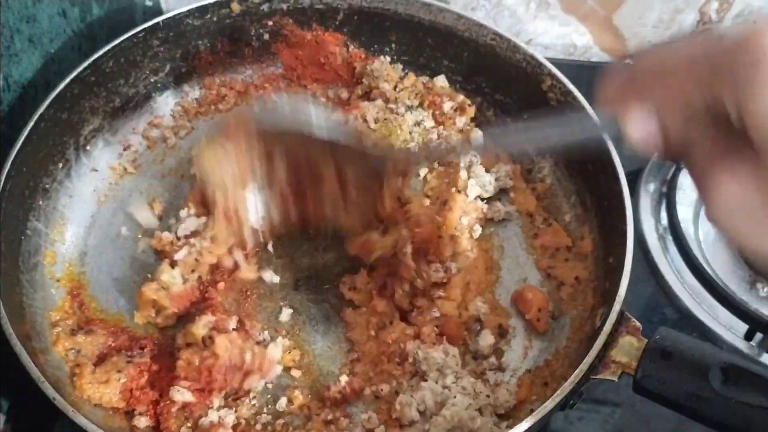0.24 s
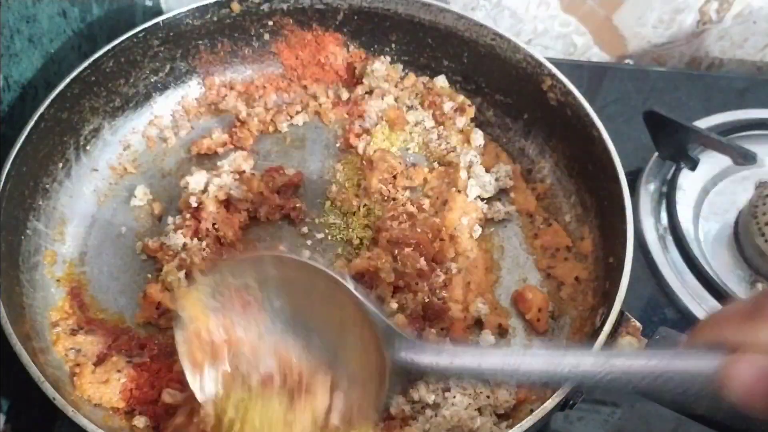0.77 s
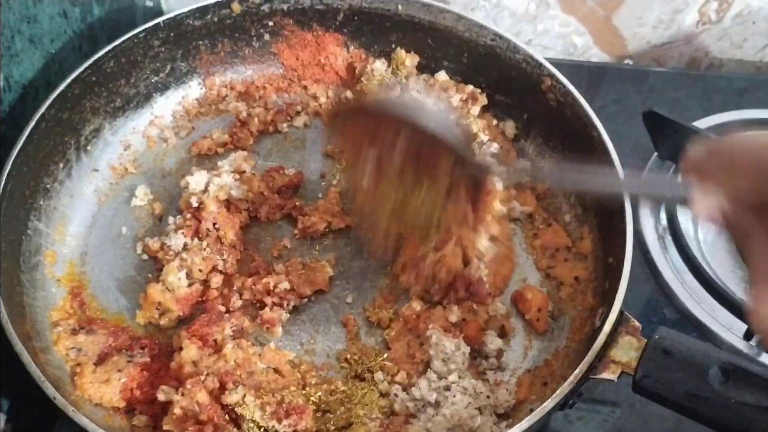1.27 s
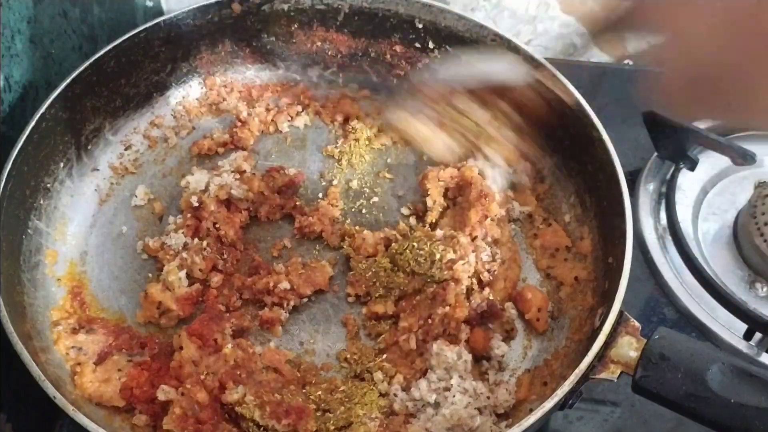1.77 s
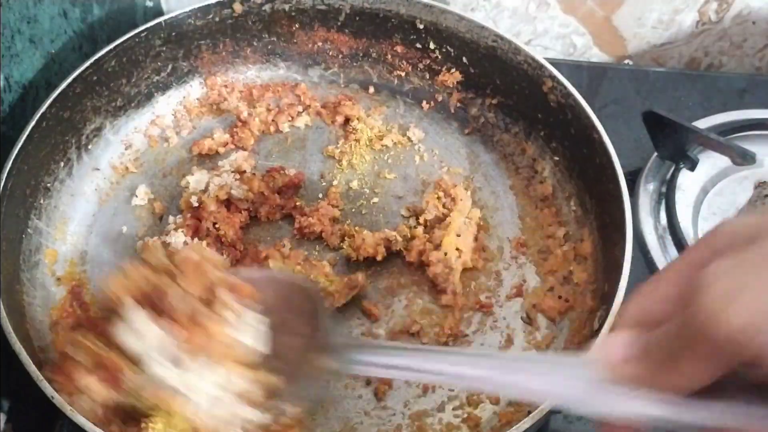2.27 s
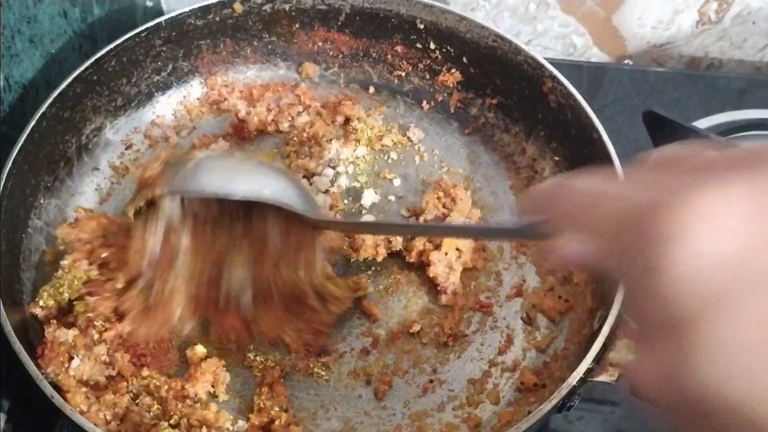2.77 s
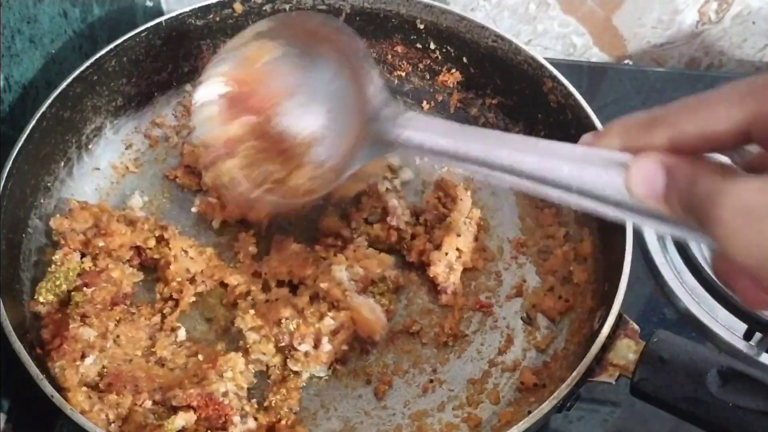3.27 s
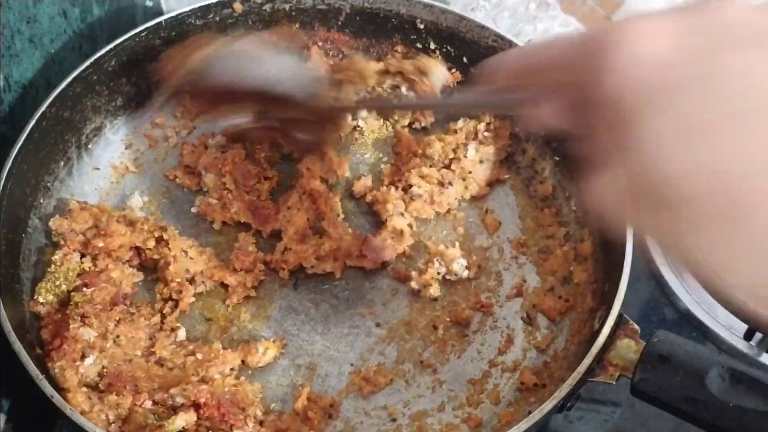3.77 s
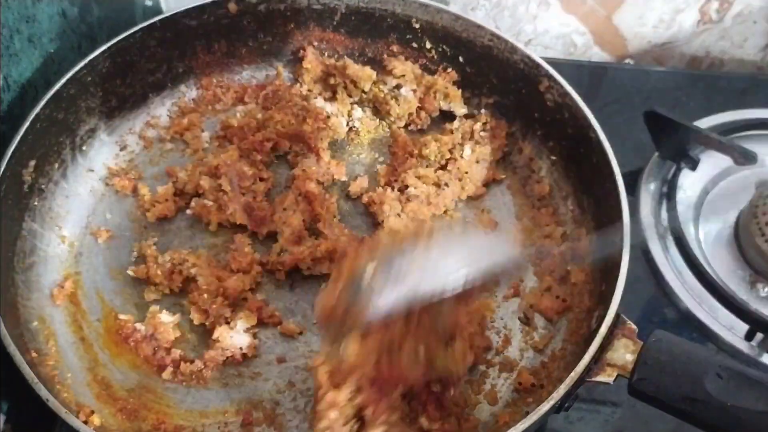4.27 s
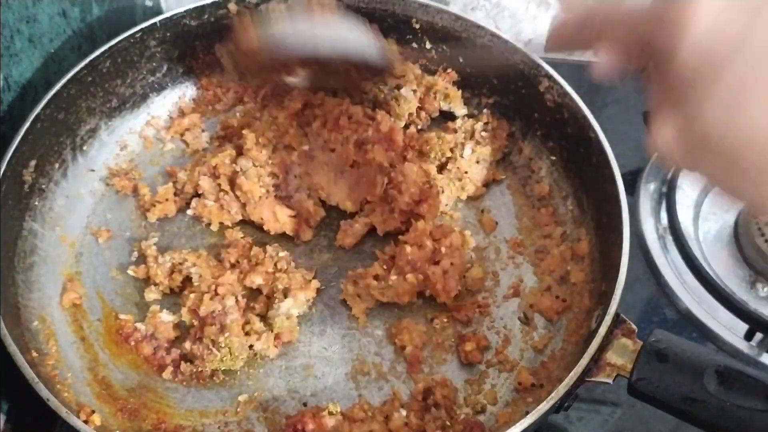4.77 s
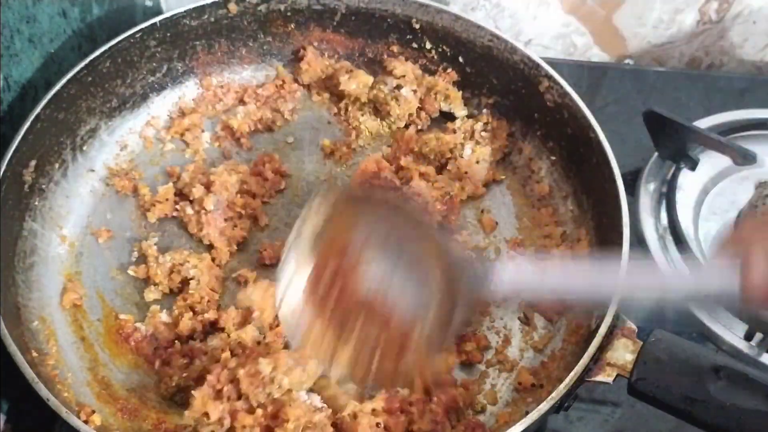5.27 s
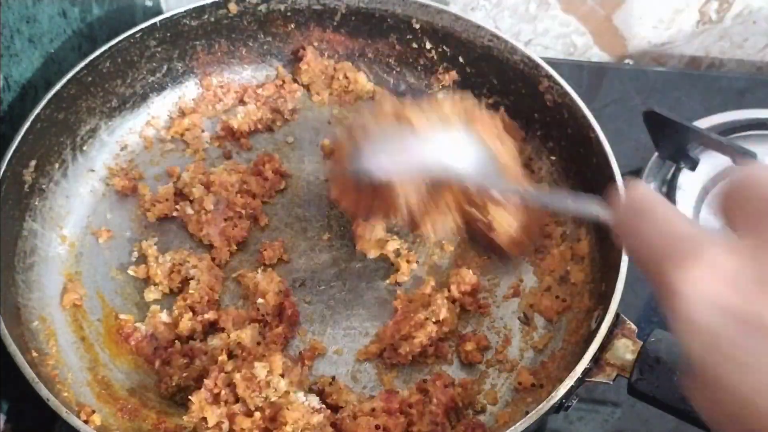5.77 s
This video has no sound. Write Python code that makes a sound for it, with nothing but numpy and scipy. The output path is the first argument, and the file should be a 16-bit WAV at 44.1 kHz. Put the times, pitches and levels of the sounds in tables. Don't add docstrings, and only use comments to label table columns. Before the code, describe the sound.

Brisk metallic taps and rasping drags of a metal spoon on a pan, close up, with constant crackling frying hiss underneath.

```python
import sys
import numpy as np
from scipy import signal
from scipy.fft import rfft, irfft, next_fast_len
from scipy.io import wavfile
from scipy.ndimage import uniform_filter1d, minimum_filter1d, map_coordinates

SR = 44100
rng = np.random.default_rng(int(sys.argv[2]) if len(sys.argv) > 2 else 0)


def log_audio(samples):
    frames = np.atleast_2d(samples).T
    limited = np.clip(frames, -1, 1)
    pcm = np.round(limited * 32767).astype(np.int16)
    wavfile.write(sys.argv[1], SR, pcm)


def attenuation_scalar(level_db):
    decades = np.asarray(level_db, float) / 20
    return 10 ** decades


N = 265923

# time in seconds, level in dB.
SIZZLE_LEVEL = [(0.0, -33.5), (0.22, -35), (0.37, -31), (0.84, -32), (1.26, -30.5), (1.53, -32),
                (1.91, -33.5), (2.87, -32), (3.02, -33.5), (3.31, -35.5), (3.79, -33), (4.06, -33),
                (4.75, -29), (4.95, -31.5), (5.62, -32.5), (5.81, -33.5), (6.03, -32.5)]
# frequency in Hz, density in dB per Hz.
BUBBLE_SPECTRUM = [(59, -36), (100, -19), (356, -10.5), (543, -17.5), (941, -12), (1160, -14.5),
                   (1780, -11), (2890, -11.5), (3280, -22), (3570, -14), (4800, -13), (8500, -3),
                   (10100, -2.5), (11200, 3.5), (15700, -14.5)]
# frequency in Hz, width in Hz, level in dB.
PAN_LOW_MODES = [(745.2, 47.8, 0.5), (800.5, 59.7, 6), (845.7, 52.4, 4), (948, 23.2, 6), (1009.6, 87.2, 2),
                 (1055.2, 39.8, -1.5), (856, 681, -9)]
# frequency in Hz, width in Hz, level in dB.
PAN_HIGH_MODES = [(1247.3, 52, -5.5), (1350, 42, 2.5), (1353.3, 37.5, -1.5), (1460, 86, -6.5),
                  (1659, 63.4, -1.5), (1779.3, 74.5, -4), (1924.8, 71.7, -1), (1460, 496, -7.5)]
# frequency in Hz, width in Hz, level in dB.
TRIVET_MODES = [(240.5, 56.8, 0.5), (361.8, 40.6, 1.5), (431.3, 83, -1.5), (633.6, 31.5, 1.5)]
# frequency in Hz, width in Hz, level in dB.
RIM_MODES = [(1997.7, 49, -4.5), (2270.4, 61, -9), (2411, 73, -3), (2743, 62, -16.5), (2955.4, 46.5, -6),
             (2620, 1295, -10.5)]
# frequency in Hz, density in dB per Hz.
RASP_SPECTRUM = [(1500, -44.5), (2600, 0.5), (3520, 4.5), (4500, 4), (6300, 4.5), (8700, 5), (10300, 2.5),
                 (11300, 10.5), (12500, -1.5), (15500, -17)]
# landing in seconds, force in dB, high over low pan modes in dB,
# weight on the trivet over force in dB, time to fade 20 dB in seconds.
SKIDS_ON_STEEL = [(0.187, -25, 0.4, -3, 0.171), (.559, -33.5, 5.5, 4, .06), (.930, -43.5, -6.5, 6.5, 0.12),
                  (1.004, -33, 3, -17, 0.16), (1.338, -38.5, 2.5, 9, 0.0933), (1.690, -37, -8, 0.5, 0.1234),
                  (1.734, -25.5, -2, -7, 0.12), (1.8, -41.5, 4, 1, 0.22), (1.91, -40.5, 1, -.5, 0.15),
                  (2.053, -30, .7, -7.5, 0.14), (2.19, -46, 7, 4, .12), (2.77, -23.5, 1.5, -11, .155),
                  (3.553, -36, -5, 4.5, 0.0726), (3.960, -34, 8.5, 3, .13), (4.01, -22, -3.5, -4.5, .13),
                  (4.12, -41, -1, 1.5, 0.1948), (4.503, -30, -2, 4.5, 0.045), (4.924, -33.5, 4, 6, 0.16),
                  (4.960, -27.5, 0.6, -4.5, 0.1809), (5.812, -37, 11.5, -18, .07)]
# moment of most force in seconds, force in dB,
# high over low pan modes in dB, time to swell 20 dB in seconds, time to fade 20 dB in seconds.
EDGE_SWEEPS = [(0.0, -39, 4.5, .05, -0.03), (.08, -48.5, 4, 0.55, 0.03), (.655, -25.5, -1, .085, 0.16),
               (.975, -44.5, 2, -0.33, .1), (1.088, -29.5, -2.5, 0.05, 0.1065),
               (1.406, -30, -0.25, 0.17, 0.0834), (1.846, -34.5, -5, 0.16, 0.19),
               (1.975, -43, 10.5, 0.32, 0.32), (2.313, -39, -3.5, 0.12, 0.27),
               (2.49, -46, -6.5, -0.36, 0.01), (2.744, -40.5, 2, -0.04, 3.53), (3.1, -54.5, 2.5, 0.2, 0.42),
               (3.25, -28, -5, 0.03, 0.159), (3.299, -29.5, -1.1, 0.1339, 0.0927),
               (3.628, -29.5, 2.5, .03, .2), (3.705, -32.5, 1, 0.16, 0.0254),
               (4.2, -35.5, -1.5, 0.2, -0.03), (4.665, -32.5, 0.58, 0.27, 0.0531),
               (5.095, -34, -8, 0.5, 0.0457), (5.375, -38, -1, 0.0476, 0.13),
               (5.46, -29, -7.5, 0.1039, 0.1256), (5.841, -30, 10, -0.13, 0.0476),
               (5.907, -24, 4, .1, .055), (6.03, -44.5, -5, 2, 0.08)]
# moment of most pressure in seconds, rasp in dB,
# time to swell 20 dB in seconds, time to fade 20 dB in seconds.
PASTE_PRESSES = [(.06, -45, -0.5, 1), (.19, -28, 0.0063, 0.2273), (.565, -29.5, 0.02, 0.1325),
                 (.65, -32.5, 0.0475, 0.297), (1.01, -34.5, 0.0966, 0.1963), (1.088, -35.5, 0.1634, 0.1),
                 (1.396, -31.5, 0.16, 0.1328), (1.922, -33, 0.3147, 0.49), (2.372, -40, 1.06, 0.39),
                 (2.765, -36.5, 0.06, 0.28), (3.263, -38.5, .4, 0.38), (3.64, -34, .1, .22),
                 (3.965, -42, .01, 0.2467), (4.012, -35, .04, 0.16), (4.19, -42.5, 0.1, 0.48),
                 (4.62, -35, .12, .12), (4.668, -31, .12, .15), (4.965, -34.5, .06, .35),
                 (5.25, -43, 1.04, -0.05), (5.438, -35.5, 0.2745, .27), (5.9, -31, .1, 0.14),
                 (6.03, -39, -0.04, -0.05)]
# levels of low modes, high modes, trivet, rim and rasp, each in dB.
REST_LEVELS = [-59, -59, -58, -64, -50]
# start in seconds, peak in dB, pitch of the knock in Hz, click in dB, thud in dB.
PAN_FLOOR_TAPS = [(0.182, -7.5, 1303, -9.5, -23.5), (0.555, -6.5, 1460, -11, -3.5),
                  (1.002, -17.5, 1051, -8.5, -27.5), (1.069, -24.5, 793, -17.5, -27),
                  (1.693, -29, 761, -7, -18.5), (2.025, -13.5, 1723, -29, -40),
                  (2.305, -29, 1008, -5.5, -26.5), (2.466, -28.5, 834, -18, -20),
                  (3.246, -21, 1047, -20, -22.5), (3.625, -23, 1360, -4, -31),
                  (4.005, -17.5, 842, -1.5, -18.5), (4.957, -10, 1854, -11, -33),
                  (4.991, -19, 1500, -15, -30), (5.364, -28, 1425, -3, -26.5), (5.809, -26, 1286, -27, -32),
                  (5.841, -16.5, 1387, -24, -32.5)]
# start in seconds, peak in dB, pitch of the knock in Hz,
# click in dB, thud in dB.
PAN_WALL_TAPS = [(1.34, -24, 1348, -11.5, -8), (1.731, -17.5, 1135, -11.5, -29),
                 (2.259, -30, 1300, -14.5, -24), (2.332, -30, 855, -10.5, -26.5),
                 (2.763, -10.5, 1004, -14, -35), (3.552, -33, 1076, -2, -9.5),
                 (3.957, -11.5, 1150, -15, -1), (4.498, -19.5, 882, -15.5, -18.5),
                 (4.921, -11.5, 1324, -14.5, 4.5), (5.088, -18, 1347, -25.5, -32.5),
                 (5.423, -23, 984, -14.5, -26.5), (5.896, -21, 973, -14.5, -38)]
# frequency in Hz, time to decay 60 dB in seconds.
KITCHEN_T60 = [(200, 0.206), (1500, 0.403), (5000, 0.283), (12000, 0.069)]
# frequency in Hz, gain in dB.
COVERED_PORT = [(100, -24), (350, -52.5), (1000, -39), (2700, -27), (4200, -23), (6200, -17), (8300, -9.5),
                (10000, -20), (11300, -28.5), (13000, -29.5), (15500, -1.5)]
# frequency in Hz, density in dB per Hz.
PHONE_NOISE = [(20, 0.5), (60, -9.5), (170, -16.5), (400, -20.5), (1000, -31), (3000, -61.5), (16000, -36)]
# frequency in Hz, share of narrow bands lost.
SPECTRAL_GAPS = [(500, 0), (1400, .08), (2600, .22), (3400, .3), (4700, .35), (6200, .36), (7500, .2),
                 (9000, .14), (11000, .1), (12500, .3), (14500, .45), (15800, .65)]

LAND_S = 0.00635
SWEEP_WEIGHT_DB = -18.5
RIM_BY_FORCE, RIM_BY_PRESS = 0.5987, 0.398
RIM_DB, WALL_SKID_DB = -1.5, 5.5
FLOOR_RIM_DB, WALL_RIM_DB = -19, -1


def unit(x):
    return x / np.sqrt(np.mean(x ** 2, axis=-1, keepdims=True) + 1e-20)


def along(points, hz):
    f, v = np.transpose(points)
    return np.interp(np.log(hz + 1), np.log(f + 1), v)


def curves(rows):
    s, *cols = np.transpose(rows)
    return [np.interp(np.arange(N) / SR, s, c) for c in cols]


def wobble(rate):
    knots = rng.standard_normal(int(N * rate / SR) + 4)
    return map_coordinates(knots, [np.arange(N) * rate / SR])


def filtered(x, response):
    m = next_fast_len(N + SR // 2)
    return irfft(rfft(x, m) * response(np.fft.rfftfreq(m, 1 / SR)), m)[..., :N]


def modes(table):
    def response(f):
        total = 0
        for k, (centre, width, db) in enumerate(table):
            damping = 1j * f * abs(width)
            total = total + (-1) ** k * attenuation_scalar(db) * damping / (centre * centre - f * f + damping)
        return total
    return response


def colour(table):
    return lambda hz: attenuation_scalar(along(table, hz))


def grains(per_s, spread_db, hiss):
    when, size, bed = rng.random(N), rng.exponential(size=N), rng.standard_normal((2, N))
    pulses = (when < per_s / SR) * attenuation_scalar(spread_db * size) * np.sign(bed[0])
    return unit(unit(pulses) + hiss * bed[1])


def frying():
    level_db, = curves(SIZZLE_LEVEL)
    flurry = attenuation_scalar(0.72 * wobble(12) + 0.41 * wobble(60))
    bubbles = np.array([grains(per_s=5000, spread_db=2.5, hiss=1.1) for port in "LR"])
    bubbles[1] += 0.12 * np.roll(bubbles[0], -7)
    return attenuation_scalar(level_db + 6) * flurry * unit(filtered(bubbles, colour(BUBBLE_SPECTRUM)))


def swells(s, swell_s, fade_s, since=-np.inf, until=np.inf):
    t = np.arange(N * 1000 // SR + 2) / 1000
    late = t - s[:, None]
    shape_db = -20 * np.maximum(-late / np.abs(swell_s)[:, None], late / np.abs(fade_s)[:, None])
    return np.where((since <= t) & (t < until), shape_db, -200)


def total(db):
    return np.sqrt(np.sum(attenuation_scalar(db) ** 2, axis=0))


def effort():
    s, force_db, high_db, weight_db, fade_s = np.transpose(SKIDS_ON_STEEL)
    at, push_db, bright_db, swell_s, die_s = np.transpose(EDGE_SWEEPS)
    when, press_db, *shape = np.transpose(PASTE_PRESSES)

    starts = np.r_[s, at]
    stroke = np.searchsorted(s, starts, side="right")
    landed, lifted = np.r_[-np.inf, s, np.inf][[stroke, stroke + 1], None] - LAND_S
    envelope_db = swells(starts, np.r_[0 * s + LAND_S, swell_s], np.r_[fade_s, die_s], landed, lifted)
    force = np.r_[force_db, push_db][:, None] + envelope_db

    low = total(force)
    high = total(force + np.r_[high_db, bright_db][:, None])
    sweep_weight_db = SWEEP_WEIGHT_DB - np.maximum(bright_db, 0) / 2
    rock = total(force + np.r_[weight_db, sweep_weight_db][:, None])
    rasp = total(press_db[:, None] + swells(when, *shape))

    to_wall_tap = np.abs(starts[:, None] - np.transpose(PAN_WALL_TAPS)[0])
    at_wall = to_wall_tap.min(axis=1, keepdims=True) < LAND_S
    is_skid = (np.arange(len(starts)) < len(s))[:, None]
    rim_force = total(force + WALL_SKID_DB * at_wall * is_skid)
    rim = attenuation_scalar(RIM_DB) * rim_force ** RIM_BY_FORCE * rasp ** RIM_BY_PRESS

    gains = np.hypot([low, high, rock, rim, rasp], attenuation_scalar(REST_LEVELS)[:, None])
    return [np.interp(np.arange(N) * 1000 / SR, np.arange(len(g)), g) for g in gains]


def scrape():
    low, high, rock, rim, rasp = effort()
    chatter = attenuation_scalar(1.17 * wobble(70) + 0.54 * wobble(25))
    slips = chatter * grains(per_s=800, spread_db=2, hiss=0.55)

    def ring(drive, table):
        steady = np.std(filtered(slips, modes(table)))
        return filtered(drive * attenuation_scalar(4.5) * slips, modes(table)) / steady

    body = ring(low, PAN_LOW_MODES) + ring(high, PAN_HIGH_MODES)
    body += ring(rock, TRIVET_MODES) + ring(rim, RIM_MODES)
    grit = np.array([grains(per_s=3500, spread_db=0.5, hiss=0.975) for port in "LR"])
    grit += 0.296 * unit(slips)
    rough = attenuation_scalar(1.35 * wobble(90)) * filtered(grit, colour(RASP_SPECTRUM))
    return body, rasp * attenuation_scalar(11.5) * unit(rough)


def taps():
    knocks, blows, thuds = np.zeros((3, N + SR))
    clicks = np.zeros((2, N + SR))
    t = np.arange(SR // 10) / SR
    floor = [(*row, FLOOR_RIM_DB) for row in PAN_FLOOR_TAPS]
    wall = [(*row, WALL_RIM_DB) for row in PAN_WALL_TAPS]
    for s, db, hz, click_db, thud_db, rim_db in sorted(floor + wall):
        at = slice(round(s * SR), round(s * SR) + len(t))
        noise = rng.standard_normal((3, len(t)))
        turns = hz * (0.7996 * t + 0.5 * 0.003002 * (1 - np.exp(-t / 0.002423)))
        bowl = np.sin(2 * np.pi * turns) + 0.178 * np.sin(2 * np.pi * 0.6812 * turns)
        rim_tones = np.sin(2 * np.pi * 2500 * t) + 0.89 * np.sin(2 * np.pi * 2080 * t)
        rim = attenuation_scalar(rim_db + 0.5 - 60 * t / 0.0322) * rim_tones
        knock_decay = attenuation_scalar(db + 6.5 - 60 * (t * hz / 19) ** 2)
        knocks[at] += knock_decay * (1 - np.exp(-t / 0.0011)) * (bowl + rim)
        click_decay = attenuation_scalar(-60 * t / 0.02626) + 0.07 * attenuation_scalar(-60 * t / 0.045)
        click_rise = 1 - np.exp(-t / 0.00052)
        clicks[:, at] += attenuation_scalar(db + click_db + 11) * click_rise * click_decay * noise[:2]
        blows[at] += attenuation_scalar(db + 22.5 - 60 * t / 0.00182) * noise[2]
        thuds[at] += attenuation_scalar(db + thud_db + 14) * np.exp(-t / 0.00026)
    gain = np.std(filtered(rng.standard_normal(N), colour(RASP_SPECTRUM)))
    ring = filtered(blows[:N], modes(PAN_LOW_MODES + PAN_HIGH_MODES + RIM_MODES))
    thud = filtered(thuds[:N], modes([(236, 29, -12.5), (401, 85, 1), (489, 226, -5.5)]))
    return knocks[:N] + ring + thud, filtered(clicks[:, :N], colour(RASP_SPECTRUM)) / gain


def echoes(x, t60, delay):
    hz, t, z = signal.stft(rng.standard_normal(SR // 2), SR, nperseg=256)
    tail = signal.istft(z * attenuation_scalar(-60 * t / t60(hz)[:, None]), SR, nperseg=256)[1]
    return signal.fftconvolve(np.pad(x, (delay, 0)), tail / np.linalg.norm(tail))[:N]


def scene():
    (rub, grit), (knock, click) = scrape(), taps()
    spoon = rub + knock + grit + attenuation_scalar([[0], [6.5]]) * click
    spoon[1] = np.roll(spoon[1], -7)
    walls = np.array([echoes(path, lambda hz: along(KITCHEN_T60, hz), delay=200) for path in spoon])
    return spoon + attenuation_scalar([[-13], [-8]]) * walls + frying()


def thinned(x, size=1024, order=170):
    n, k = np.arange(2 * size), np.arange(size)
    window = np.sin(np.pi * (n + 0.5) / (2 * size))
    basis = window[:, None] * np.cos(np.pi / size * np.outer(n + 0.5 + size / 2, k + 0.5))
    padded = np.pad(x, ((0, 0), (2 * size - order, -(N - order) % size + size)))
    blocks = padded.reshape(2, -1, size)
    lines = np.concatenate([blocks[:, :-1], blocks[:, 1:]], axis=2) @ basis
    around = np.sqrt(np.abs(uniform_filter1d(lines ** 2, size=48, axis=2)))

    patches = rng.standard_normal((*lines.shape[:2], size // 4))
    patches = uniform_filter1d(patches, size=3, axis=1)
    patches += 0.5 * np.roll(patches, 1, axis=2)
    rank = np.repeat(patches.argsort(axis=1).argsort(axis=1) / lines.shape[1], 4, axis=2)
    share = along(SPECTRAL_GAPS, (k + 0.5) * SR / (2 * size))

    power = np.sum(blocks ** 2, axis=2)
    attack = power[:, 1:] > 2.5 * power[:, :-1]
    attack |= np.roll(attack, 1, axis=1)
    kept = (rank > share) & (np.abs(lines) > 1.3 * share * around) | attack[..., None]
    halves = (lines * kept) @ basis.T * 2 / size
    joined = halves[:, 1:, :size] + halves[:, :-1, size:]
    return joined.reshape(2, -1)[:, size - order:][:, :N]


def low_pass(x):
    return signal.sosfilt(signal.butter(12, 15840, fs=SR, output="sos"), x)


def record(dry):
    ports = np.array([dry[0], filtered(dry[1], colour(COVERED_PORT))])
    ports += attenuation_scalar(-52) * unit(filtered(rng.standard_normal((2, N)), colour(PHONE_NOISE)))
    coming = -minimum_filter1d(-np.abs(ports), size=600, origin=-299)
    around = -minimum_filter1d(-np.abs(ports), size=120)
    duck = uniform_filter1d(1. * (coming > 1.1) * (around < 0.25), size=60)
    x = thinned(np.clip(ports * attenuation_scalar(-9 * duck), -1, 1))
    return low_pass(np.clip(x, -1, 1))


dry = scene()
out = record(dry)
log_audio(out)
```